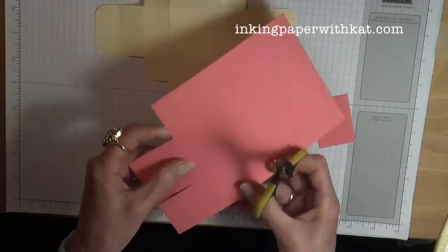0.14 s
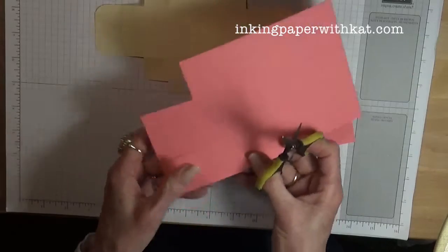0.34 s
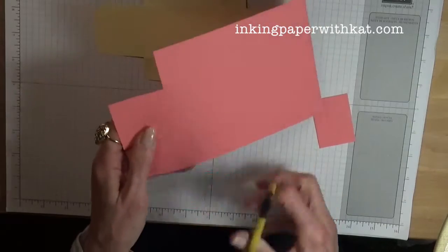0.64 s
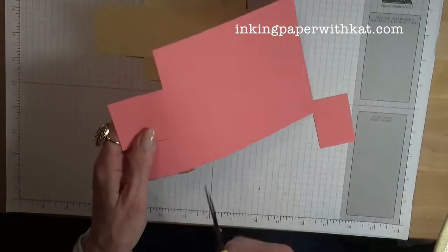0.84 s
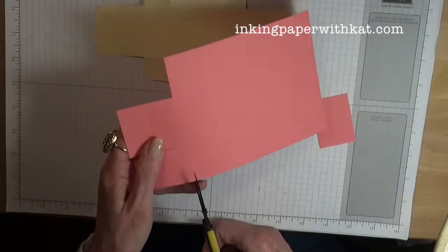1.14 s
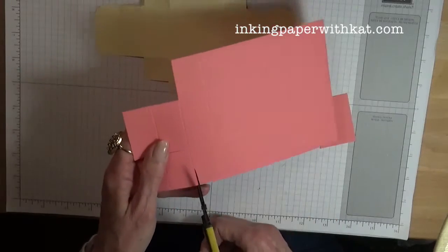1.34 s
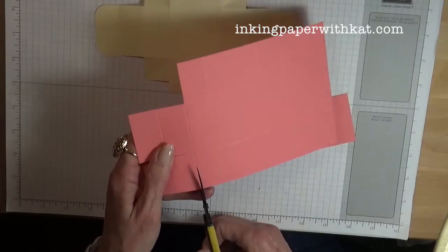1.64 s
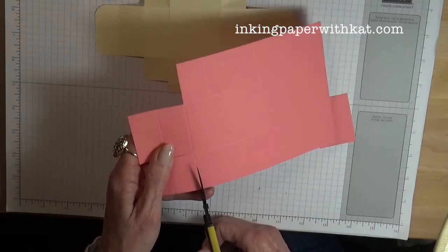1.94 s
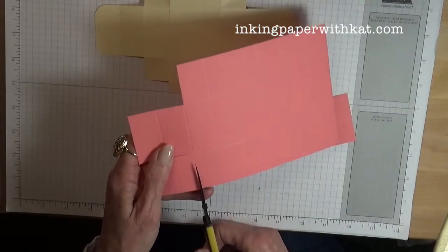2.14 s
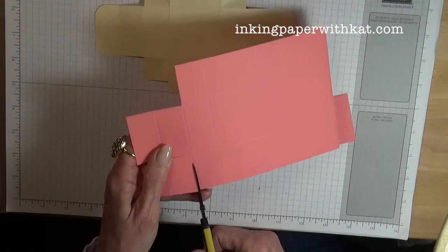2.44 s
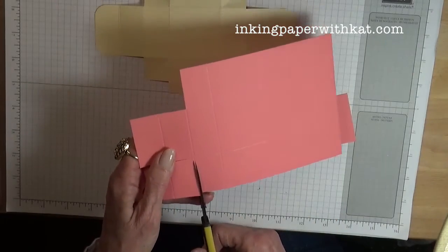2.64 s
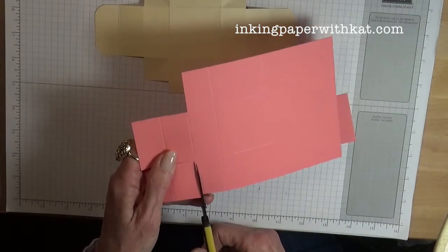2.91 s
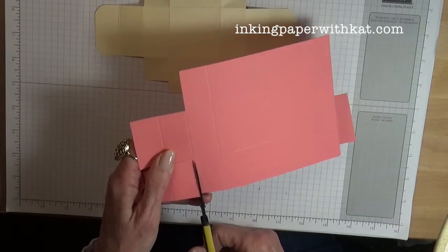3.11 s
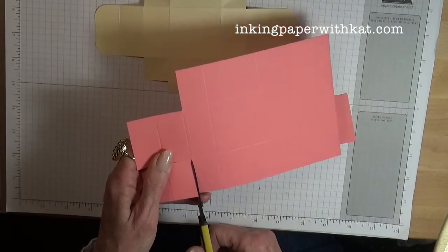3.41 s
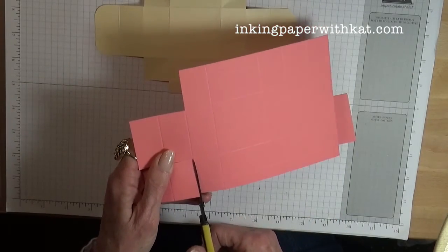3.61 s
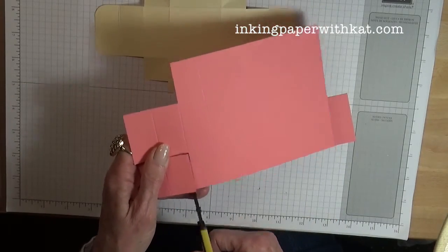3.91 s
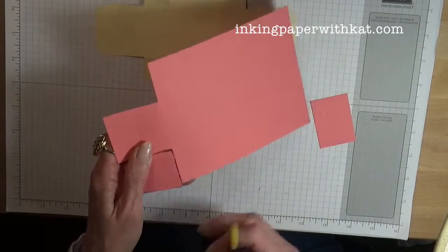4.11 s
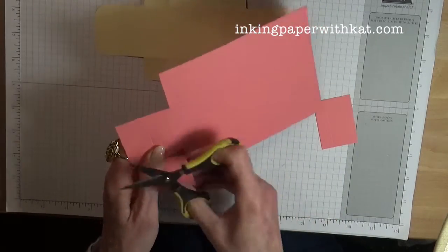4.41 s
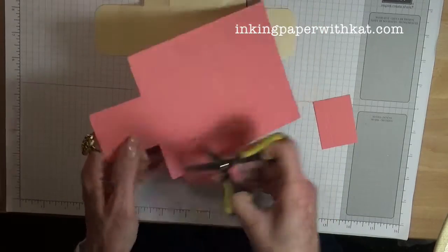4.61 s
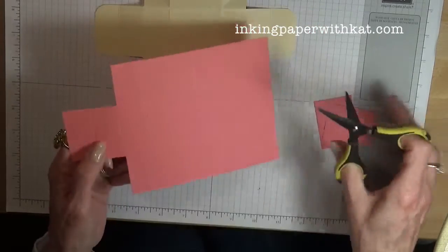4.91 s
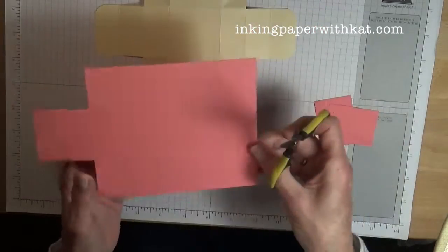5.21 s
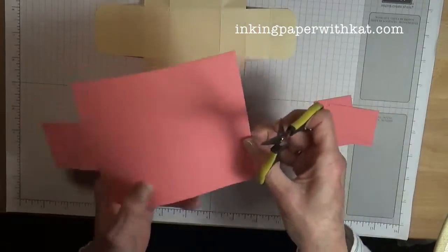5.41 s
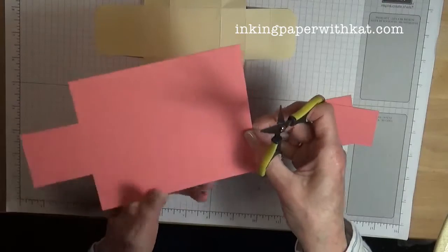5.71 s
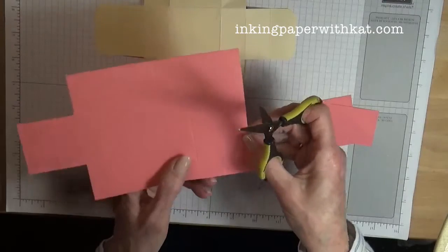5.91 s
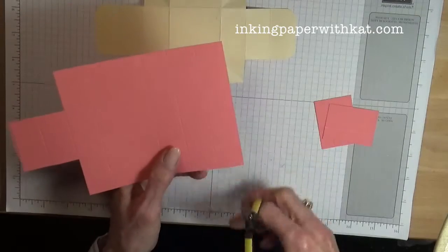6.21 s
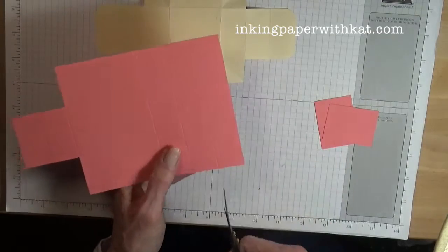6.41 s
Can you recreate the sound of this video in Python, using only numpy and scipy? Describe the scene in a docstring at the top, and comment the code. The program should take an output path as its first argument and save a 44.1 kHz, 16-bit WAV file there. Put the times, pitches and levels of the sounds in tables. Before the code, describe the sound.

Close, dry paper craft at a table indoors. First come quick card ticks and scuffs, then a pause with soft metal-on-card friction. Gritty little bites cluster into three short scissor strokes, the final one snapping loudest, followed by blades clicking open. Handling then becomes busier: crisp pops, a dull tabletop bump, rasping slides. It settles to light brushing over soft room noise with short reflections and slightly muted treble.

```python
"""Small scissors crunch through stiff card: stick-slip bites are gritty noise bursts that ring short modes.
The blades scrape on each other and into the card around the three strokes, as friction noise.
Hands slide, flick and turn the sheet: clicks with a rattle, rasping friction noise, and sine thuds in the table.
A quiet room adds short reflections, drifting noise and a wavering hum; a soft limit and a low-pass end the chain."""
import sys
import numpy as np
from scipy import signal
from scipy.fft import rfft, irfft
from scipy.io import wavfile
from scipy.ndimage import uniform_filter1d

SR = 44100
rng = np.random.default_rng(int(sys.argv[2]) if len(sys.argv) > 2 else 0)


def unload_wav(signal):
    """Save mono or channel-first audio to the path in sys.argv[1] as 16-bit WAV at rate SR, clipped to [-1, 1]."""
    wavfile.write(
        sys.argv[1],
        SR,
        np.round(np.clip(np.atleast_2d(signal).T, -1, 1) * 32767).astype(np.int16),
    )


N = 288855  # length [samples]

# The clear bursts as the blades bite, stick and slip. Each row: peak time in seconds, drive level in dB,
# card body and steel sizzle in dB relative to it, length in ms.
BITES = [(2.103, -50, 10, -4, 10), (2.216, -50, 3.5, 1, 9.8), (2.246, -43, -5, -7, 9.3),
         (2.274, -40, -2, -1, 5.4), (2.287, -43, 4.5, 0, 18), (2.337, -32.5, 2, 3, 7.6),
         (2.356, -43, 11, 8.5, 11.6), (2.377, -44.5, 6.5, -2, 9.2), (2.393, -37.5, 1.5, 5.5, 4.8),
         (2.409, -48, 4, -1, 8.8), (3.005, -61.5, 19, -3, 9), (3.017, -63.5, 17, -3, 8.4),
         (3.08, -50, -4, -6, 6), (3.097, -49, -1, 0, 10), (3.107, -45, 9, 3.5, 12.5),
         (3.133, -44, -10, -7, 8.4), (3.172, -37, -6, -8.5, 7.5), (3.21, -50, 10.5, 7, 10),
         (3.2203, -33, 1.5, -0.5, 3.3), (3.231, -37, -7, -8, 5.4), (3.242, -36, 5, -3, 3.85),
         (3.747, -34, -0.5, -10, 7.5), (3.762, -35, 7.5, 6, 10), (3.768, -36, 8, 1, 5),
         (3.782, -27, 8.5, -11, 8), (3.7824, -14, 8, 2.5, 1.79), (3.856, -44.5, 14, -13, 3.8),
         (3.997, -30, -14.5, -7.5, 8.9), (4.006, -22.5, -12.5, -6.5, 3.9), (4.0245, -27.5, -23, -25, 3.4),
         (4.522, -26, -14, -15, 6.9), (4.534, -49, 1, -16, 2.9), (4.64, -27, -20, -17, 12.4)]
# Blades sliding on each other and into the card. Each row: start in seconds, rise, hold and fall in ms,
# drive level in dB, card body and steel sizzle in dB relative to it.
BLADE_SCRAPES = [(1.13, 15, 50, 230, -45.5, 3, -9), (1.32, 37, 92, 54, -48.5, 2.5, -22),
                 (1.96, 28, 76, 50, -50.5, 0.5, -16), (2.07, 25, 28, 100, -50.5, 2.5, -6),
                 (2.19, 71, 88, 30, -47, 3.5, -1), (2.51, 44, 112, 100, -41, 1, -11),
                 (2.709, 25, 30, 77, -48, -5, -25), (2.96, 22, 130, 30, -62, 0, -20),
                 (3.853, 6.7, 31, 17, -36.5, 0, -1.5), (3.94, 19, 15, 18, -54, 2, 10.5),
                 (4.015, 10, 7.9, 300, -48, -2.5, -12)]
# Resonances of scissors and gripped card. Each row: frequency in Hz, relative level in dB, t60 in seconds.
SCISSORS_MODES = [(634, -20, 0.035), (1090, -2, 0.013), (1310, 0.5, 0.012), (1546, -4.5, 0.012),
                  (3040, -13, 0.018), (3420, 0, 0.0037), (5260, 0.5, 0.0046), (8200, -1.5, 0.011),
                  (9480, 8.5, 0.0018)]
BITE_RISE = 0.4  # share of a bite's length spent swelling


def scissors():
    """Stick-slip: bites swell and die within milliseconds over the steady friction of the blades."""
    drive = np.zeros((3, N))
    ms = np.arange(2000) / SR * 1000
    rub(drive, BLADE_SCRAPES, grain_db=1.7, clump=110)
    for peak_s, level_db, body_db, sizzle_db, length_ms in [*BITES, *nibbles()]:
        rise_ms = BITE_RISE * length_ms
        fall_ms = (1 - BITE_RISE) * length_ms
        swell = np.minimum(ms / rise_ms, 1) ** 2
        decay = np.exp(-np.maximum(ms - rise_ms, 0) / fall_ms)
        tear = 2.8 * burst(swell * decay, grain_db=3.5, clump=30)
        add(drive, peak_s - rise_ms / 1000, amp(level_db) * tear, body_db, sizzle_db)
    return amp(3.0) * ring(drive, SCISSORS_MODES, modes_db=-21.0, direct_db=-20.0, low_hz=446.0)


# Closing strokes in which small bites come by chance. Each row: start and end in seconds,
# mean drive level at the start and at the end in dB.
STROKES = [(1.98, 2.328, -56, -47), (3.083, 3.14, -45.5, -44), (3.2, 3.247, -53, -42.5)]
NIBBLES_PER_S, NIBBLE_MS, NIBBLE_SPREAD_DB = 70, 8, 4.5  # mean rate, mean length, spread to either side


def nibbles():
    """Irregular stick-slip: small bites at uneven moments, tending to grow as each stroke closes."""
    rows = []
    for start, end, first_db, last_db in STROKES:
        gap, size, body, length = rng.random((40, 4)).T
        peak_s = start + np.cumsum(0.5 + gap) / NIBBLES_PER_S
        level_db = np.interp(peak_s, [start, end], [first_db, last_db])
        level_db = level_db + NIBBLE_SPREAD_DB * (2 * size - 1)
        body_db = 8.3 * body - 7.0
        sizzle_db = np.full(40, -3.0)
        length_ms = NIBBLE_MS * (0.5 + length)
        stroke = zip(peak_s, level_db, body_db, sizzle_db, length_ms)
        rows += [row for row in stroke if row[0] < end]
    return rows


# Snaps and knocks of card, fingers and handles. Each row: start in seconds, drive level in dB,
# body, edge and rattle in dB relative to it, rattle decay constant in ms.
SNAPS = [(0.087, -47.5, 20, -8., -1.5, 8), (.113, -49.5, 20.5, -6., -2, 7.8), (.178, -31, 8, 4.5, -4.5, 4.),
         (.228, -20, 0, -5, -22, 4.3), (0.292, -55, 24.5, -12, -3, 8.5), (0.4484, -23.5, 5.5, 2.5, -7, 3.7),
         (2.981, -28.5, 6.5, -19, -15, 4.1), (3.521, -55, 17.5, 6, -3, 19),
         (4.229, -33, -15, -4, -6.5, 4.8), (4.2577, -14, 1.5, -1.5, 0, 1.47),
         (4.626, -24.5, -5, 1.5, -1.5, 6.4), (4.815, -52, -2, -4, -6., 4.),
         (4.873, -22.5, -7, -15, -1.5, 2.8), (4.886, -26, 1, -13, -1, 3), (5.096, -41, 2, 3, -6, 3.8),
         (5.1323, -6, 7, 5.5, -4, 1.93), (5.1686, -16.5, 9.5, -3, -3, 3.4),
         (5.253, -13.5, 4.5, -3, -15, 3.2), (5.293, -26, 13.5, -1, -6, 3.2),
         (5.383, -26.5, -6, 4.5, -3, 4.3), (5.47, -46, 20.5, -2, -8.5, 9),
         (5.4877, -18.5, -13, 1.5, -3.5, 2), (5.502, -28.5, 13, -8., -11.5, 2.3),
         (5.626, -32, 9.5, -5, 4, 1.96), (6.037, -20, -14, -25, -4.5, 1.9)]
# The sheet rubbing on fingers and table. Each row: start in seconds, rise, hold and fall in ms,
# drive level in dB, body and edge in dB relative to it.
SHEET_SLIDES = [(0, 0.5, 104, 90, -47, -4, -9), (.135, 19, 98.5, 17, -44.5, 3.5, 5),
                (.448, 7.5, 86, 120, -46.5, 4.5, -0.5), (.545, 19, 38, 30, -57, 9, 12.5),
                (.61, 25, 250, 300, -69, 15.5, 11), (4.26, 5, 30, 104, -57, 16.5, 15),
                (4.35, 84, 15, 155, -49.5, 4, 11), (4.53, 5.4, 55, 40, -54, -1, 11),
                (4.648, 4.1, 22, 195, -52, 8, 9), (4.812, 5.7, 56, 20, -57, 9, 7.5),
                (4.89, 6.2, 20, 180, -63.5, 11.5, 2), (5.092, 9.9, 22, 10, -54, 23.5, 15),
                (5.136, 3, 9.4, 18, -42, 21, 7), (5.171, 5, 24, 150, -53, 9, 2),
                (5.255, 4.5, 33, 22, -57.5, 11.5, 15), (5.297, 3.8, 20, 29, -47, 13, 10),
                (5.365, 21.3, 15, 39, -34, 1, -1), (5.462, 11, 11, 46, -55, 15, 3),
                (5.49, 5.8, 27, 36, -49, 2, 6), (5.52, 22, 42, 29, -46, 11.5, 6.5),
                (5.635, 55.6, 24, 37, -34, 2.5, -0.5), (5.732, 8.3, 9.4, 58, -37.5, 7.5, 1),
                (5.765, 26.4, 39, 56, -45.5, 3.5, 6.5), (5.84, 25, 35, 240, -56, 8.5, 8),
                (6.275, 21, 12, 94, -46.5, -12, -10), (6.325, 19, 56, 300, -50, 1.5, -4.5),
                (6.43, 51, 64, 20, -57.5, 7, -16)]
# Wandering pitch of the rasp of the free span of card. Each row: time in seconds, frequency in Hz.
RASP = [(0, 3130), (.17, 3300), (.25, 2460), (0.451, 2940), (.6, 2900), (4.27, 3780), (4.44, 3900),
        (4.65, 3770), (4.82, 2760), (5.1, 3920), (5.14, 2290), (5.3, 3170), (5.4, 2780), (5.69, 2550),
        (5.8, 3170), (6.3, 4000), (6.36, 3270), (6.53, 2200)]
# Resonances of the sheet over the table. Each row: frequency in Hz, relative level in dB, t60 in seconds.
SHEET_MODES = [(572, -1.5, 0.068), (1097, 12.5, 0.007), (1268, 8, 0.044), (2015, -3, 0.1),
               (3340, 5, 0.0019), (4880, 1.5, 0.0099), (9830, 6.5, 0.0076)]


def sheet():
    """Impulse and friction excitation: snaps are clicks with a short rattle, slides are hiss with a rasp."""
    drive = np.zeros((3, N))
    ms = np.arange(3000) / SR * 1000
    for start_s, level_db, body_db, edge_db, rattle_db, fall_ms in SNAPS:
        envelope = np.minimum(ms / 0.55, 1) * np.exp(-ms / fall_ms)
        snap = amp(rattle_db) * burst(envelope, grain_db=6.8, clump=24)
        snap[:3] += amp(0.5) * np.array([1, -1, 0.5])  # the crack itself, a push and its rebound
        add(drive, start_s, amp(level_db) * snap, body_db, edge_db)
    rub(drive, SHEET_SLIDES, grain_db=1.03, clump=180, rasp=RASP)
    return amp(1.0) * ring(drive, SHEET_MODES, modes_db=-29.5, direct_db=-4.5, low_hz=310.0)


# Dull bumps passed into the table top. Each row: start in seconds, envelope level in dB,
# pitch in Hz, time in ms from the start to the envelope's peak.
THUDS = [(3.784, -42, 327, 1.8), (4.259, -51, 256, 3.2), (5.132, -47.5, 223, 15), (5.1335, -26, 558, 3.5),
         (5.167, -35.5, 187, 2.9), (5.891, -44.5, 302, 2.5), (5.929, -53, 209, 11)]


def table():
    """Damped oscillation: each bump is a sine at a table-top pitch under a soft-edged envelope."""
    out = np.zeros(N)
    t = np.arange(5000) / SR
    for start_s, level_db, hz, peak_ms in THUDS:
        u = t * 1000 / peak_ms
        envelope = np.e * u * np.exp(-u)  # reaches 1 at u = 1
        out[round(start_s * SR):][:5000] += amp(level_db) * envelope * np.sin(2 * np.pi * hz * t)
    return out


SWELL_DB = 20  # climb of a movement in its rise; it sinks as much per fall time
CRACKLES_PER_S, CRACKLE_DB = 150, 9.5  # single fibres snapping above the hiss


def rub(drive, moves, grain_db, clump, rasp=None):
    """Friction noise: hiss and snags rise, hold and fall with each movement; a free span adds its rasp."""
    for start_s, rise, hold, fall, level_db, body_db, edge_db in moves:
        size = max(round((rise + hold + 2 * fall) * SR / 1000), 512)
        ms = np.arange(size) / SR * 1000
        climb = np.minimum(ms / rise - 1, 0)
        sink = np.maximum(ms - rise - hold, 0) / fall
        swell_db = SWELL_DB * (climb - sink)
        hiss = crinkle(grit(size, grain_db, clump), patchy_db=3.0)
        snags = (rng.random(size) < CRACKLES_PER_S / SR) * rng.standard_normal(size)
        friction = hiss + amp(CRACKLE_DB) * snags
        if rasp is not None:
            rasp_hz = np.interp(start_s + ms / 1000, *np.transpose(rasp))
            friction = 0.8 * friction + 1.8 * resonate(friction, rasp_hz, width=650.0)
        add(drive, max(start_s, 0), amp(level_db + swell_db) * friction, body_db, edge_db)


def grit(size, grain_db, clump):
    """Amplitude modulation: noise strength varies over clumps of samples, as rough fibres catch."""
    jumps = unit(uniform_filter1d(rng.standard_normal(size), max(int(clump), 1)))
    return unit(rng.standard_normal(size) * amp(grain_db * jumps))


def crinkle(x, patchy_db):
    """Spectral modulation: the contact wanders over the surface, so patches flare and fade."""
    z = signal.stft(x, nperseg=256, noverlap=192)[2]
    patches = rng.standard_normal(z.shape[::-1]).T
    patches = uniform_filter1d(patches, size=5, axis=0)  # smooth over frequency
    patches = unit(uniform_filter1d(patches, size=12, axis=1))  # smooth over time
    return unit(signal.istft(z * amp(patchy_db * patches), nperseg=256, noverlap=192)[1][:len(x)])


def burst(shape, grain_db, clump):
    """Energy conservation: gritty noise under an envelope carries the energy of the envelope."""
    sound = shape * grit(len(shape), grain_db, clump)
    return sound * np.linalg.norm(shape) / np.linalg.norm(sound)


def resonate(x, hz, width):
    """Moving resonance by heterodyning: shifts the curve hz down to zero, smooths, and shifts back."""
    turn = np.exp(2j * np.pi * np.cumsum(hz) / SR)
    r = np.exp(-np.pi * width / SR)
    return 2 * (turn * signal.lfilter([1 - r], [1, -r], x / turn)).real


def add(drive, start_s, sound, body_db, edge_db):
    """Superposition: adds one excitation to the dull, middle and bright registers."""
    part = drive[:, round(start_s * SR):][:, :len(sound)]
    size = part.shape[1]
    part[0] += (amp(body_db) * sound)[:size]
    part[1] += sound[:size]
    part[2] += (amp(edge_db) * sound)[:size]


BODY_HZ, EDGE_HZ = 2400, 6500  # upper border of the dull register, lower border of the bright one


def ring(drive, modes, modes_db, direct_db, low_hz):
    """Modal resonance: joins the registers and convolves them with an object's decaying modes."""
    dull = signal.sosfilt(signal.butter(2, BODY_HZ, fs=SR, output="sos"), drive[0])
    mid = signal.sosfilt(signal.butter(2, [BODY_HZ, EDGE_HZ], "band", fs=SR, output="sos"), drive[1])
    bright = signal.sosfilt(signal.butter(2, EDGE_HZ, "high", fs=SR, output="sos"), drive[2])
    joined = dull - mid + bright  # neighbours meet in opposite phase, so the middle one is turned over
    t = np.arange(4096) / SR
    response = np.zeros(4096)
    for hz, db, t60 in modes:
        mode = amp(-60 * t / t60) * np.cos(2 * np.pi * hz * t)
        response += amp(db + modes_db) * mode / np.linalg.norm(mode)
    response[0] += amp(direct_db)  # the unresonant part of the contact
    no_bass = signal.butter(4, low_hz, "high", fs=SR, output="sos")  # small things radiate no bass
    return signal.sosfilt(no_bass, signal.oaconvolve(joined, response)[:N])


# Decay of the room's reflections. Each row: frequency in Hz, t60 in seconds.
WALLS = [(300, 0.32), (1500, 0.15), (5000, 0.17), (11000, 0.15)]


def walls(x):
    """Reverberation: sparse reflections of random sign, each band dying at its own speed."""
    count = SR // 40
    taps = np.zeros((2, SR // 2 + 200))
    at = 100 + np.arange(count) * 20 + rng.integers(0, 20, (2, count))
    np.put_along_axis(taps, at, rng.choice([-1.0, 1.0], at.shape), 1)
    taps[1] = 0.75 * taps[0] + 0.66 * taps[1]  # the two channels share much of their echoes
    hz, t, z = signal.stft(taps, SR, nperseg=256)
    decay_db = -60 * t / read(WALLS, hz)[:, None]
    furnishing_db = -0.25 * hz[:, None] / 1000  # soft furnishings swallow the treble
    tail = signal.istft(z * amp(decay_db + furnishing_db), SR, nperseg=256)[1]
    tail /= np.linalg.norm(tail, axis=1, keepdims=True)
    return signal.fftconvolve(x[None], tail, axes=1)[:, :N]


# Spectrum shape of the room noise. Each row: frequency in Hz, relative density in dB.
AIR = [(12, -41), (20, -5), (92, -12), (174, -15), (227, -14.5), (320, -17.5), (463, -19), (764, -20),
       (1400, -20), (1640, -23), (1830, -21.5), (5690, -30), (11000, -31), (14300, -66), (22000, -120)]
AIR_DB = -53.5  # rms level of the room noise without the hum
# Left-right likeness of the room noise. Each row: frequency in Hz, correlation from 0 to 1.
SAME = [(60, 1), (220, 0.84), (840, 0.17), (3120, 0.35), (11700, 0.61)]
# Slow level curve of the room's low rumble. Each row: time in seconds, gain in dB.
RUMBLE = [(0, 2), (.5, 2), (1.2, 0), (1.7, -3.5), (2.2, -2), (3, -4), (3.8, 0), (4.3, 1), (5, 1),
          (5.8, 4.5), (6.55, -1)]
RUMBLE_LOW_HZ, RUMBLE_HIGH_HZ = 120, 320
# Appliance drone and whine. Each row: centre frequency in Hz, full width at half amplitude in Hz, rms in dB.
HUM = [(89, 9., -61.), (120, 5., -67.), (575, 30., -73.), (1800, 70., -69.), (3690, 70., -74.5)]


def room_tone():
    """Shaped noise: partly correlated hiss and rumble with drifting patches, plus narrow-band hum."""
    frames = N // 512 + 5
    hz = np.fft.rfftfreq(2048, 1 / SR)
    a, b, c, d, patches = rng.standard_normal((frames, 1025, 5)).T
    patches = uniform_filter1d(patches, 30, 0)  # smooth over frequency
    patches = unit(uniform_filter1d(patches, 10, 1))  # smooth over time
    same = np.clip(read(SAME, hz), -1, 1)[:, None]
    left = a + 1j * b
    right = same * left + np.sqrt(1 - same ** 2) * (c + 1j * d)
    z = np.array([left, right]) * amp(read(AIR, hz)[:, None] + 0.9 * patches)
    low = (hz > RUMBLE_LOW_HZ) & (hz < RUMBLE_HIGH_HZ)
    rumble_db = np.interp(np.arange(frames) * 512 / SR, *np.transpose(RUMBLE))
    z *= amp(low[:, None] * rumble_db)
    out = amp(AIR_DB) * unit(signal.istft(z, nperseg=2048, noverlap=1536)[1][:, :N])
    f = np.fft.rfftfreq(N, 1 / SR)
    for hum_hz, width, db in HUM:
        line = 1 / (1 + ((f - hum_hz) / width * 2) ** 2)  # narrow noise wavers like an unsteady tone
        out += amp(db) * unit(irfft(rfft(rng.standard_normal(N)) * line, N))
    return out


def amp(db):
    """Logarithmic level: decibels to gain."""
    return 10 ** (np.asarray(db) / 20)


def unit(x):
    """Normalisation: scales to rms 1."""
    return x / np.sqrt(np.mean(x ** 2) + 1e-20)


def read(points, hz):
    """Logarithmic frequency: interpolates a spectrum table on a log axis."""
    f, value = np.transpose(points)
    return np.interp(np.log(hz + 1), np.log(f + 1), value)


def scene():
    """Level panning: the scissors sit a hair right of the middle, sheet and table a hair left."""
    cut = scissors()
    paper = sheet() + table()
    near = cut * amp([[-0.3], [0.3]]) + paper * amp([[0.2], [-0.2]])
    return near + amp(-9.5) * walls(cut + paper) + room_tone()


CUT_HZ = 11050  # upper band limit


def record(dry):
    """Soft saturation rounds the hardest peaks; then a steep linear-phase low-pass limits the band."""
    held = 0.8 * np.tanh(dry / 0.8)
    lowpass = signal.firwin(1023, CUT_HZ, window=("kaiser", 8), fs=SR)
    return signal.oaconvolve(held, lowpass[None], "same")


dry = scene()
out = record(dry)
unload_wav(out)
```